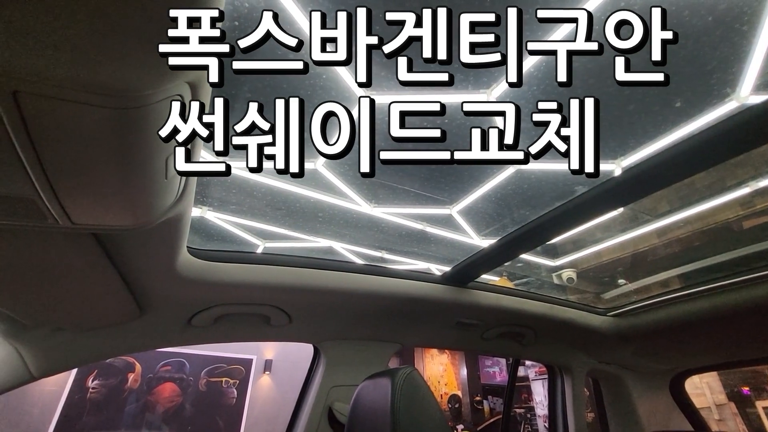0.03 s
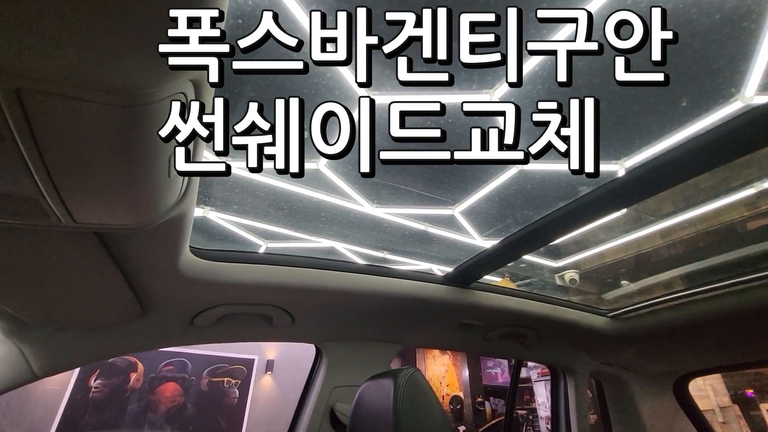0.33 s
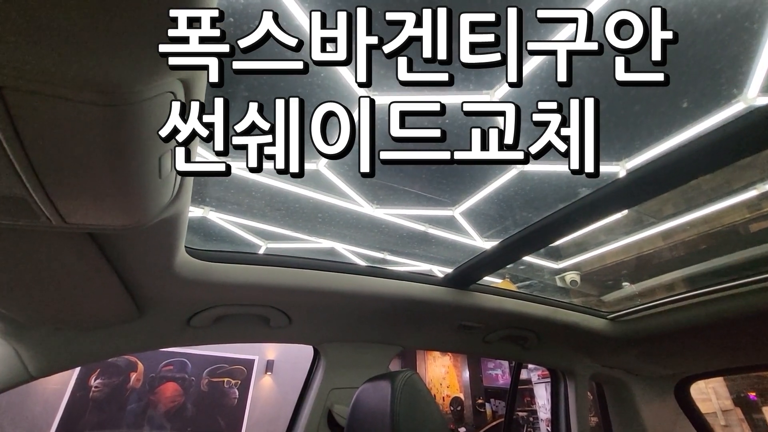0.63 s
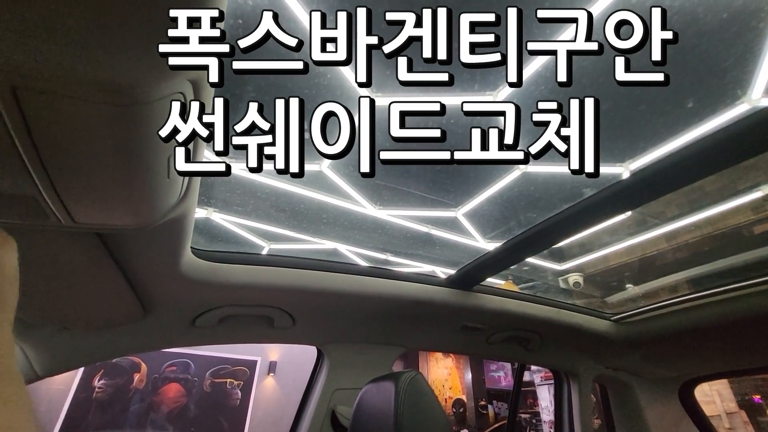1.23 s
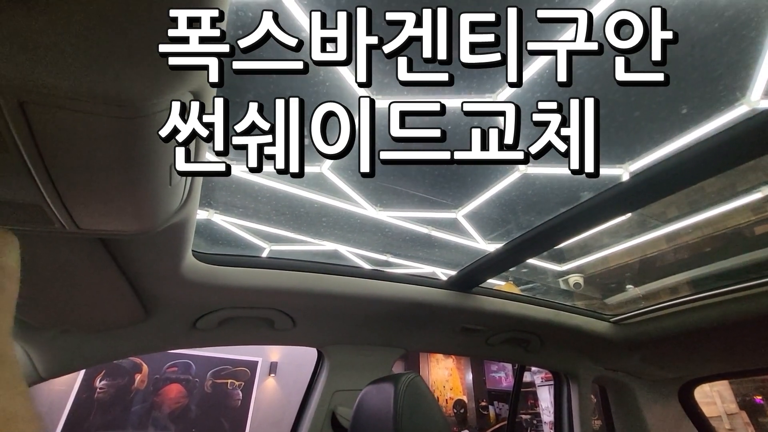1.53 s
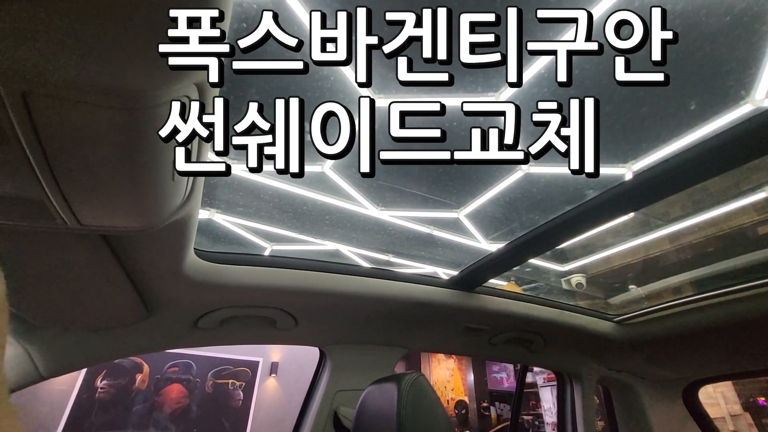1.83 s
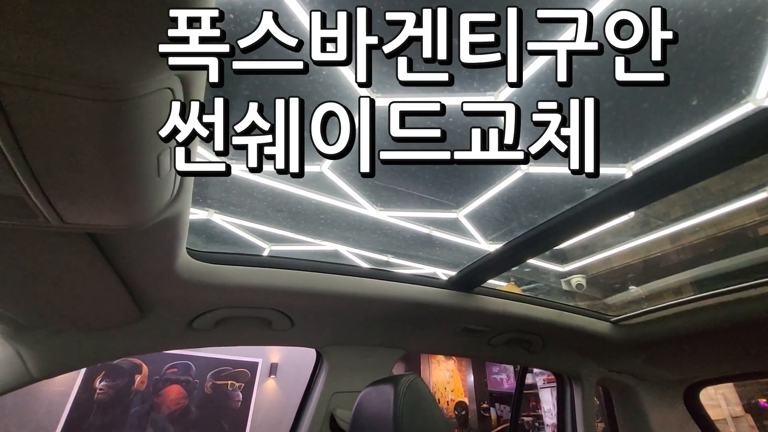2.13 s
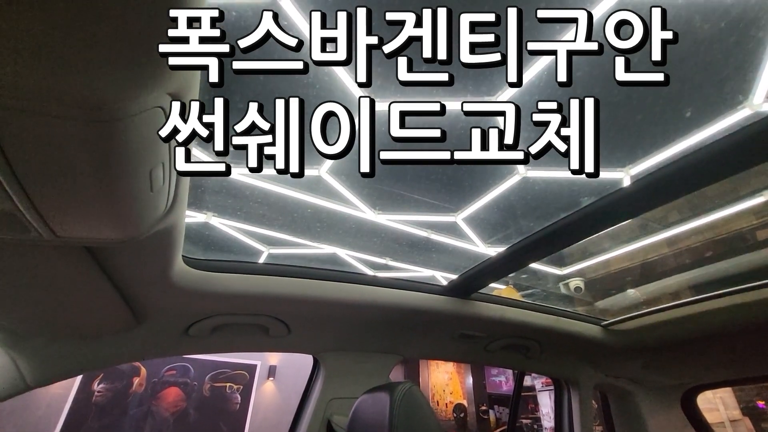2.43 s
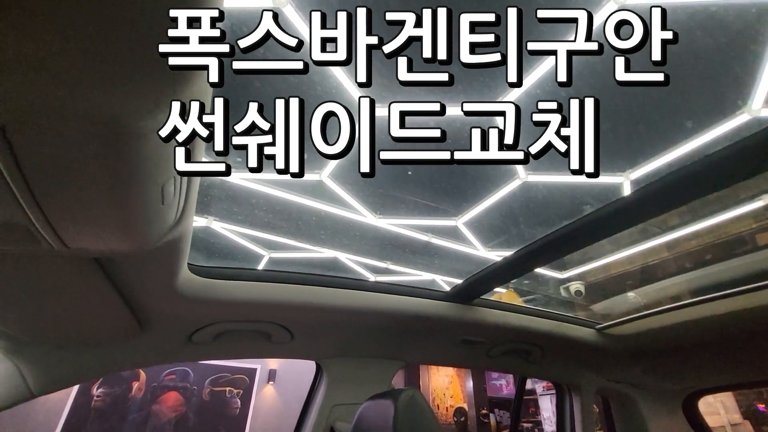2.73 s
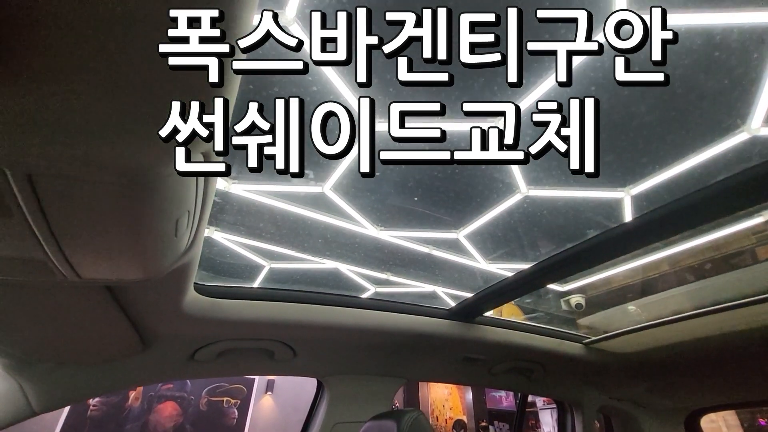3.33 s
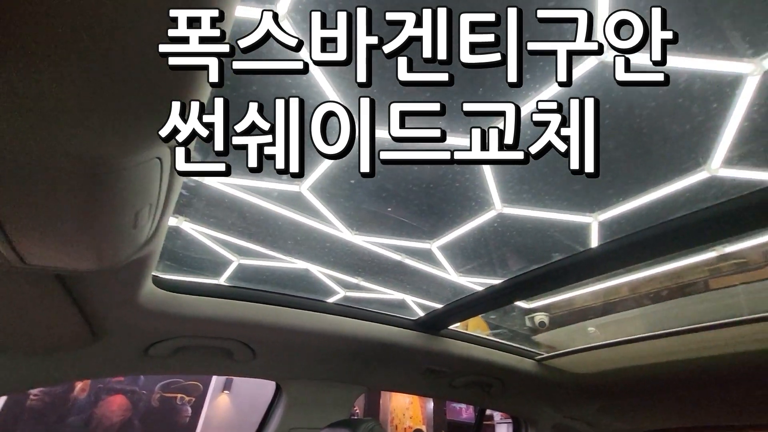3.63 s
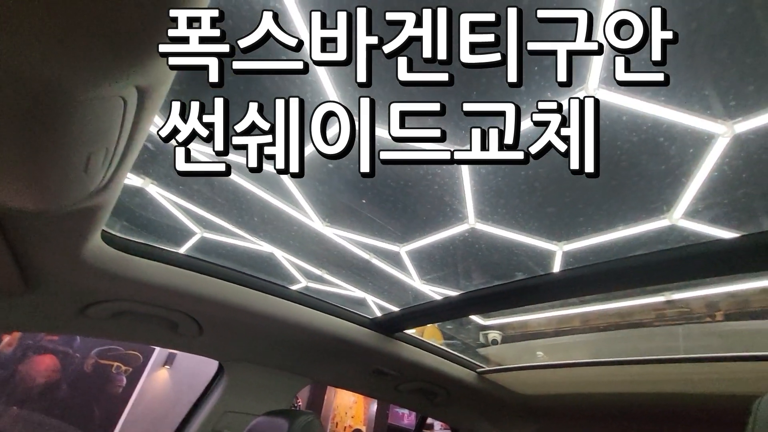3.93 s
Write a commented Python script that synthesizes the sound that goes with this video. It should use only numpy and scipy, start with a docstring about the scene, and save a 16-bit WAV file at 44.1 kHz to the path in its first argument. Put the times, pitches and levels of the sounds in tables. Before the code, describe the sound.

A car's roof sunshade motor whines after several knocks, over a low idling engine rumble.

```python
"""Sunshade in an idling car

Inside a parked car the engine booms over a bed of cabin rumble and vent air. After a faint click,
a sleeve rustles, a hand brushes the roof console, and the switch, latch and trim click and knock.
Then the sunshade motor runs up to a steady whine that sets the roof lining droning, while the
fabric hisses along its rails and briefly sticks and slips in thin squeaks."""
import sys
import numpy as np
from scipy import signal
from scipy.fft import rfft, irfft
from scipy.io import wavfile
from scipy.ndimage import uniform_filter1d

SR = 44100
rng = np.random.default_rng(int(sys.argv[2]) if len(sys.argv) > 2 else 0)


def materialize(psi):
    """Save the field psi as 16-bit PCM at rate SR to the path in sys.argv[1].

    A 1-D psi becomes a single channel; in a 2-D psi each row is a channel.
    """
    bounded = np.clip(np.atleast_2d(psi).T, -1, 1)
    quanta = np.round(bounded * 32767).astype(np.int16)
    wavfile.write(sys.argv[1], SR, quanta)


N = 176400
T, HZ = np.arange(N) / SR, np.fft.rfftfreq(N, 1 / SR)

# Engine orders: firing_multiple, rms_db
ENGINE_ORDERS = [(.5, -55), (1, -27.5), (1.5, -50.5), (2, -54), (2.5, -46), (3, -64), (4, -58), (4.5, -59),
                 (5.5, -49.5), (6, -62), (6.5, -58.5), (7.5, -66.5), (14, -72), (16, -74.5), (17, -79)]
# How the boom reaches the ears: freq_hz, left_over_right_db, left_lead_rad
BOOM_IMAGE = [(26, 1.5, -0.26), (52, 3, -0.56), (104, -2.5, -0.042), (280, -6, 0.26), (887, -12, 0.18)]
# Tone of the cabin rumble and vent air: freq_hz, relative_db
CABIN_EQ = [(20, -13), (40, -2), (62, -0.5), (90, -3), (125, 1.5), (160, -1.5), (240, -9.5), (340, -9),
            (450, -15.5), (600, -21.5), (850, -22.5), (1150, -35.5), (1600, -39.5), (2200, -49),
            (3100, -53), (4000, -56), (6300, -63.5), (8500, -57), (10800, -50.5), (12700, -56.5),
            (14200, -57.5), (15500, -57.5)]
# Stereo image of that bed: freq_hz, correlation
CABIN_IMAGE = [(60, 1), (240, 0.78), (480, 0.46), (950, -0.35), (1900, 0.0049), (3800, -0.35), (7500, 0.96),
               (15000, .8)]
# Tone of the sleeve rustle: freq_hz, relative_db
SLEEVE_EQ = [(200, 17.5), (750, 14), (1100, 11.5), (1800, 7), (2600, 2.5), (4000, 1.5), (7000, -6),
             (11000, -8), (15500, -10.5)]
# The sleeve's movement: time_s, level_db
SLEEVE_ENVELOPE = [(0, -57), (.1, -59), (.2, -54.5), (.3, -49.5), (.36, -50), (0.429, -51), (.47, -66),
                   (.52, -76), (.62, -100)]
# Stereo image of sleeve, shade and rails: freq_hz, correlation
CLOTH_IMAGE = [(500, 0.19), (1500, -0.29), (4000, 0.19), (6500, -0.14), (8500, 1), (15000, 1)]
# A faint click at the very start, then knocks on switch and trim: start_s, rise_s, decay_s,
# thump_hz, thump_db, body_hz, body_db, clack_hz, clack_db, snap_hz, snap_db, tick_db, tick_rolloff_hz
KNOCK_HITS = [(.024, 0.0018, 0.0079, 160, -62, 750, -51, 1600, -59, 4900, -60, -56, 15000),
              (0.299, 0.012, 0.0093, 124.4, -21.5, 530, -42.5, 1730, -50.5, 4500, -72, -72, 8000),
              (0.416, 0.0057, 0.012, 440, -36, 700, -41, 1290, -49.5, 9200, -58.5, -72, 12000),
              (.684, 0.0038, 0.019, 161, -62, 740, -48.5, 1800, -70, 4700, -85, -73.5, 8100),
              (1.218, 0.011, 0.023, 159, -54, 500, -53, 1670, -53.5, 9600, -69, -62.5, 8450),
              (1.485, 0.0022, 0.0064, 157, -22, 495, -32.5, 1770, -57.5, 4700, -55.5, -52.5, 15000),
              (1.495, 0.0017, 0.0071, 119, -24, 644, -43.5, 1800, -53, 6200, -63, -66, 12000),
              (1.735, 0.011, 0.026, 145.5, -23.5, 500, -58, 1550, -58.5, 4480, -80, -77, 8000),
              (1.798, 0.0025, 0.031, 132, -31.5, 990, -47.5, 1600, -61, 7500, -65, -57, 12000),
              (1.817, 0.0044, 0.012, 121, -22.5, 550, -44, 1500, -57, 3600, -59, -64, 11000),
              (2.097, .005, 0.018, 130, -41, 1480, -48.5, 2460, -51, 3500, -61, -56, 10000),
              (2.523, 0.0017, 0.0033, 126, -46, 840, -42, 1420, -52, 2320, -64, -57, 10000),
              (2.527, 0.0025, 0.0076, 463, -43, 950, -50, 1600, -45.5, 2260, -53, -54, 10000)]
# Tone of each hit's tick: freq_hz, relative_db
TICK_EQ = [(300, -25.5), (1500, -7.5), (3500, -3), (6000, -5), (8000, -6), (11000, -6), (14000, -6),
           (16000, -4)]
# Stereo image of those hits: freq_hz, correlation
KNOCK_IMAGE = [(300, 1), (600, 0.1), (1200, -0.32), (4000, 0.26), (7000, 0.48), (10000, 0.92)]
# Two strokes of the hand on the console: time_s, level_db
BRUSH_ENVELOPE = [(.9, -97), (1.17, -69.5), (1.3, -81), (1.45, -70), (1.7, -92)]
# Modes of the roof switch and of the shade's latch: pitch_hz, relative_db, t60_s
SWITCH_RING = [(1223, 0.5, .06), (1630, 0, .06), (1850, 8, 0.05), (2780, -7, 0.056), (4320, -10, 0.075),
               (6400, -9, .025), (7230, -5, 0.045), (8440, -9, .02), (9560, -1, 0.032), (10500, -7, .03)]
LATCH_RING = [(454, 13, 0.051), (573, 4, .05), (1400, 4, 0.071), (1860, 2, 0.064), (4680, -3, .07),
              (4840, -6, 0.04), (5550, -9, .06), (6130, 0, .055), (8600, -13, .05), (9800, -8, .05),
              (12300, 0, .06), (14100, -10, .06)]
# Their clicks: start_s, level_db
SWITCH_HITS = [(1.2195, -59), (1.226, -52.5)]
LATCH_HITS = [(1.485, -57), (1.797, -63)]
# Tone of the fabric sliding in its rails: freq_hz, relative_db
SHADE_EQ = [(200, 12.5), (500, 10.5), (1000, 7.5), (1500, 6), (2000, 0.5), (2700, 1.5), (4000, -.5),
            (4900, -2), (6500, -4.5), (8500, -8.5), (10500, -6.5), (12300, -5.5), (13800, -12.5),
            (15700, -9.5)]
# Swell of that slide: time_s, level_db
SHADE_ENVELOPE = [(1.7, -100), (1.79, -74), (1.84, -63.5), (2.0, -58.5), (2.15, -54), (2.35, -50.5),
                  (2.5, -51), (2.53, -50), (2.57, -48), (2.6, -50.5), (2.8, -51), (3.05, -52),
                  (3.35, -51.5)]
# Resonances of the rails: pitch_hz, width_hz, lift_db
RAIL_RESONANCES = [(2610, 300, 4.5), (4850, 260, 5.5), (10100, 5000, 1.5)]
# Squeaks of the fabric: start_s, length_s, from_hz, to_hz, level_db
FABRIC_SQUEAKS = [(2.435, .06, 11800, 12200, -65), (2.445, .045, 9200, 8700, -60),
                  (2.483, .015, 10350, 10200, -61), (2.5, .04, 8900, 8900, -55.5),
                  (2.54, .03, 8850, 8950, -60), (2.63, .022, 11800, 12100, -59),
                  (2.665, .045, 9050, 9200, -58), (2.675, .03, 10000, 10100, -60),
                  (2.706, .018, 9500, 9950, -58), (2.728, .025, 12550, 12350, -58),
                  (2.738, .032, 9650, 9950, -57), (2.768, .016, 10650, 10350, -58),
                  (2.815, .035, 10600, 10000, -59), (2.833, .025, 11200, 12100, -61),
                  (2.835, .022, 9100, 8950, -60), (2.88, .035, 8450, 8200, -61)]

FIRING_HZ = 51.79
MOTOR_ON_S, SPIN_UP_S = 2.2, 0.24


def amp(db):
    """Decibels to gain."""
    return 10 ** (np.asarray(db) / 20)


def unit(x):
    """Scales to rms 1."""
    return x / np.sqrt(np.mean(x ** 2) + 1e-20)


def curve(points):
    """A frequency table drawn across the spectrum on a log axis."""
    hz, value = np.transpose(points)
    return np.interp(np.log(HZ + 1), np.log(hz + 1), value)


def envelope(points):
    """A table of times and levels as a gain ride."""
    return amp(np.interp(T, *np.transpose(points)))


def ramp(start_s, length_s):
    """A straight fade from 0 to 1."""
    return np.clip((T - start_s) / length_s, 0, 1)


def pan(db):
    """Left and right gains; positive leans left."""
    return amp([[db / 2], [-db / 2]])


def drift(rate_hz):
    """Random wander up to about rate_hz, rms 1."""
    return unit(irfft(rfft(rng.standard_normal(N)) / (1 + (HZ / rate_hz) ** 4), N))


def noise(gain, correlation):
    """Coloured stereo noise, rms 1; a correlation of 1 is mono, 0 is wide."""
    a, b = rfft(rng.standard_normal((2, N)))
    correlation = np.clip(correlation, -1, 1)
    mid, side = a * np.sqrt(1 + correlation), b * np.sqrt(1 - correlation)
    return unit(irfft(np.array([mid + side, mid - side]) * gain, N))


def peak(hz, width_hz):
    """The gain of a resonance with steep skirts."""
    return 1 / (1 + (1.3 * (HZ - hz) / width_hz) ** 2)


def ripple(depth_db=2.1):
    """Fine peaks and dips that the cabin's reflections leave in each channel."""
    grid_hz = np.arange(0, SR / 2, 15)
    rows = rng.standard_normal((2, len(grid_hz)))
    combs = np.array([np.interp(HZ, grid_hz, unit(uniform_filter1d(row, 3))) for row in rows])
    return amp(depth_db * np.minimum(HZ / 1500, 1) * combs)


def engine():
    """The idle booms in the cabin at the firing rate, with weak orders around it."""
    firings = np.cumsum(FIRING_HZ * (1 + 0.0029 * drift(5.18))) / SR
    image_hz, pan_db, lead_rad = np.transpose(BOOM_IMAGE)
    out = np.zeros((2, N))
    for multiple, db in ENGINE_ORDERS:
        hz = multiple * FIRING_HZ
        flutter_db = 0.42 * drift(14) if multiple == 1 else 1.8 * drift(4.0)
        left_lead = np.array([[np.interp(hz, image_hz, lead_rad)], [0]])
        phase = 2 * np.pi * (multiple * firings + rng.random()) + left_lead
        out += np.sqrt(2) * amp(db + flutter_db) * np.sin(phase) * pan(np.interp(hz, image_hz, pan_db))
    return out


def cabin(whistle_on_s=0.68, swell_at_s=3.6):
    """Rumble and vent air throb with the crankshaft, under a thin whistle and one late low swell."""
    throb = 1 + 0.044 * np.sin(np.pi * FIRING_HZ * T) + 0.088 * np.sin(2 * np.pi * FIRING_HZ * T)
    air = noise(amp(curve(CABIN_EQ)) * ripple(), curve(CABIN_IMAGE))
    air *= amp(-38.5 + 0.87 * drift(0.83)) * throb
    whistle = noise(peak(3570, 160), 0.15) * amp(-85 + 2 * drift(18)) * ramp(whistle_on_s, 0.04)
    swell = noise(peak(130, 11), 1) * amp(-41) * np.exp(-((T - swell_at_s) / 0.2) ** 2)
    return (air + whistle + swell) * pan(-0.14)


def cloth(eq, levels, grain_db):
    """Sliding cloth: fine friction noise, made grainy by an uneven grip."""
    friction = noise(amp(curve(eq)) * ripple(), curve(CLOTH_IMAGE))
    return friction * envelope(levels) * amp(grain_db * drift(70)) * pan(-0.5)


def knocks(body_q=3.14, clack_q=2.4, snap_q=8.1, thump_decay_s=0.015, tail_db=-8.5, tail_decay_s=0.03):
    """A faint click, then contacts that ring the trim and thump the roof lining, with a cabin tail."""
    tick_tone, image, reflections = unit(amp(curve(TICK_EQ))), curve(KNOCK_IMAGE), ripple()
    out = np.zeros((2, N))
    for (start_s, rise_s, decay_s, thump_hz, thump_db, body_hz, body_db,
         clack_hz, clack_db, snap_hz, snap_db, tick_db, rolloff_hz) in KNOCK_HITS:
        modes = [(body_hz, body_q, body_db), (clack_hz, clack_q, clack_db), (snap_hz, snap_q, snap_db)]
        tick = amp(tick_db) * unit(tick_tone / np.hypot(1, (HZ / rolloff_hz) ** 3))
        power = tick ** 2 + sum((amp(db) * unit(peak(hz, hz / q))) ** 2 for hz, q, db in modes)
        t = np.maximum(T - start_s, 0)
        attack, release_s = ramp(start_s, rise_s), np.clip(t - rise_s, 0, 1)
        tail = amp(tail_db) * np.exp(-release_s / tail_decay_s)
        shape = attack * np.hypot(np.exp(-release_s / decay_s), tail)
        out += shape * np.sqrt(power.mean()) * noise(np.sqrt(power) * reflections, image)
        thump = np.exp(-release_s / thump_decay_s) * np.sin(2 * np.pi * thump_hz * t)
        out += amp(thump_db) * attack * thump
    return out


def hand():
    """A hand brushes faintly over the roof console."""
    return noise(peak(1800, 450), 0) * envelope(BRUSH_ENVELOPE) * amp(2 * drift(25)) * pan(1.5)


def clicks(modes, hits, rise_s=0.003, length_s=0.12, spread_cycles=0.4):
    """Hard plastic snaps and rings briefly in its own modes, a little differently at each ear."""
    t = T[:round(length_s * SR)]
    attack = np.minimum(t / rise_s, 1)
    out = np.zeros((2, N))
    for start_s, db in hits:
        first = round(start_s * SR)
        for hz, mode_db, t60_s in modes:
            ring = np.sin(2 * np.pi * (hz * t + spread_cycles * rng.random((2, 1)) + rng.random()))
            out[:, first:first + len(t)] += amp(db + mode_db - 60 * t / t60_s) * attack * ring
    return out


def rail_rasp(on_s=2.17, release_at_s=2.84, fade_s=0.34):
    """The dragging fabric sets the rails ringing."""
    ring_power = sum(peak(hz, width) ** 2 * (amp(db) ** 2 - 1) for hz, width, db in RAIL_RESONANCES)
    tone = np.sqrt(ring_power) * unit(amp(curve(SHADE_EQ)))
    rasp = noise(tone, curve(CLOTH_IMAGE)) * np.sqrt(np.mean(tone ** 2))
    drag = ramp(on_s, fade_s) * (1 - ramp(release_at_s, fade_s))
    return rasp * envelope(SHADE_ENVELOPE) * drag * amp(1.5 * drift(45))


def motor(whine_hz=559.2, sag_hz_per_s=4.7, fade_db_per_s=1.6, gear_on_s=3.68, gear_ratio=1.755):
    """A wavering whine swells in and sags under load; a higher gear tone joins late."""
    running_s = T - MOTOR_ON_S
    pitch_hz = (whine_hz - sag_hz_per_s * running_s) * (1 + 0.002 * drift(11.7))
    phase = 2 * np.pi * np.cumsum(pitch_hz) / SR + np.array([[-1.1], [0]])  # the left ear lags
    whine_db = -47 - fade_db_per_s * running_s + 1.8 * drift(40)
    whine = ramp(MOTOR_ON_S, SPIN_UP_S) ** 2 * amp(whine_db) * np.sin(phase)
    gear = ramp(gear_on_s, 0.028) * amp(-63 + 2 * drift(16)) * np.sin(gear_ratio * phase)
    return np.sqrt(2) * (whine + gear) * pan(-0.6)


def roof_drone():
    """The running motor makes the roof lining drone."""
    return noise(peak(208, 126), 0.86) * amp(-49) * ramp(MOTOR_ON_S, SPIN_UP_S)


def squeaks(max_lag_s=0.08, stray_detune=0.08, stray_db=-4.5):
    """Thin, scratchy stick-slip whistles, each trailed by a fainter stray slip at another pitch."""
    lags_s = max_lag_s * rng.random(len(FABRIC_SQUEAKS))
    shifts = 1 + stray_detune * rng.standard_normal(len(FABRIC_SQUEAKS))
    strays = [(start_s + lag_s, length_s, from_hz * shift, to_hz * shift, db + stray_db)
              for (start_s, length_s, from_hz, to_hz, db), lag_s, shift
              in zip(FABRIC_SQUEAKS, lags_s, shifts)]
    waver = 1 + 0.008 * drift(45.6) + 0.009 * drift(940)  # wobble plus fast scratch
    grip = unit(amp(3.5 * drift(100)))
    out = np.zeros(N)
    for start_s, length_s, from_hz, to_hz, db in FABRIC_SQUEAKS + strays:
        progress = ramp(start_s, length_s)
        pitch_hz = (from_hz + (to_hz - from_hz) * progress) * waver
        arch = np.sqrt(abs(np.sin(np.pi * progress)))
        out += amp(db) * grip * arch * np.sin(2 * np.pi * np.cumsum(pitch_hz) / SR)
    return out * pan(-2.3)


def scene():
    """The mix from the front seat: idle bed, close rustles and clicks, moving shade."""
    sleeve = cloth(SLEEVE_EQ, SLEEVE_ENVELOPE, grain_db=0.9)
    shade_hiss = cloth(SHADE_EQ, SHADE_ENVELOPE, grain_db=0.5)
    plastic = clicks(SWITCH_RING, SWITCH_HITS) + clicks(LATCH_RING, LATCH_HITS)
    bed = engine() + cabin()
    close_sounds = sleeve + hand() + knocks() + plastic
    sunshade = motor() + roof_drone() + shade_hiss + rail_rasp() + squeaks()
    return bed + close_sounds + sunshade


def record(dry):
    """The level eases up at the start, and a steep low-pass trims the very top."""
    fade_from_db, fade_s, cutoff_hz = -8.5, 0.76, 15750
    faded = dry * amp(fade_from_db * (1 - ramp(0, fade_s)))
    lowpass = signal.firwin(511, cutoff_hz, window=("kaiser", 9), fs=SR)
    return signal.oaconvolve(faded, lowpass[None], "same")


dry = scene()
out = record(dry)
materialize(out)
```